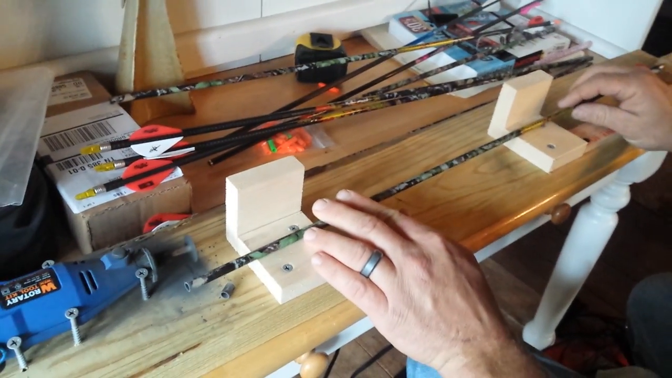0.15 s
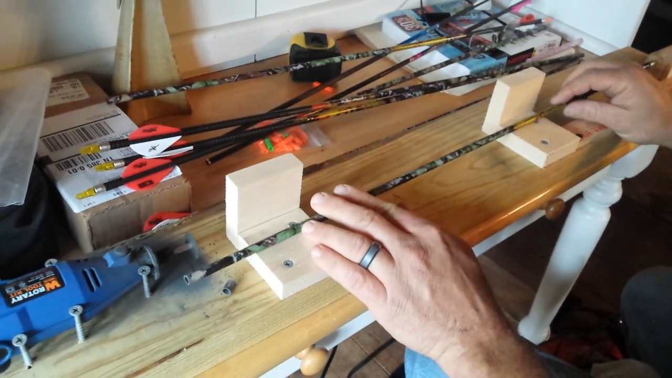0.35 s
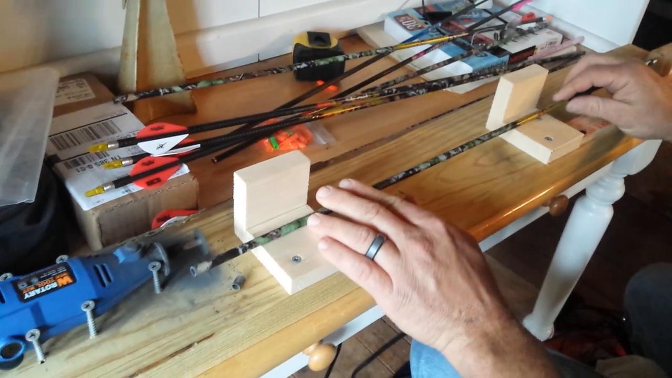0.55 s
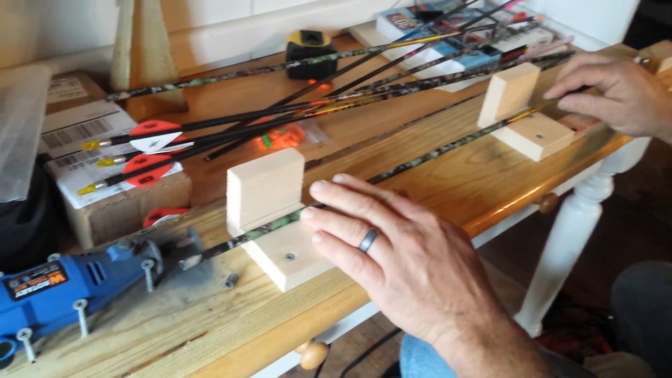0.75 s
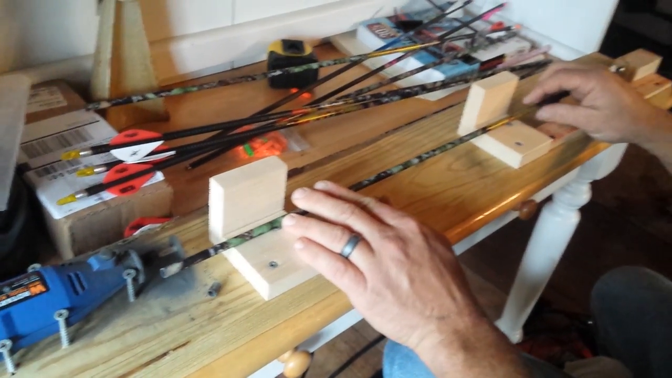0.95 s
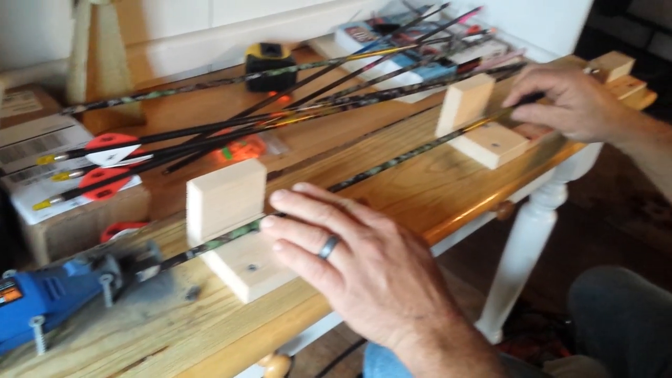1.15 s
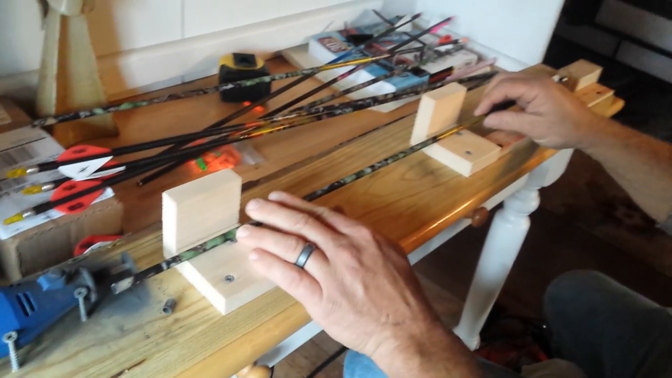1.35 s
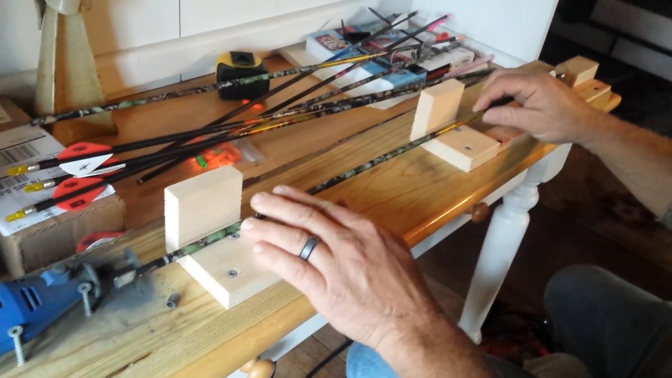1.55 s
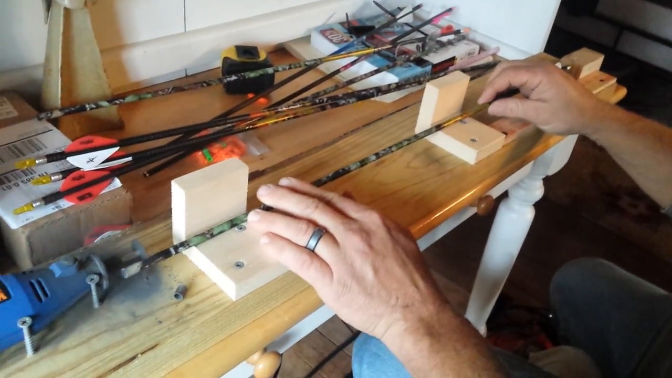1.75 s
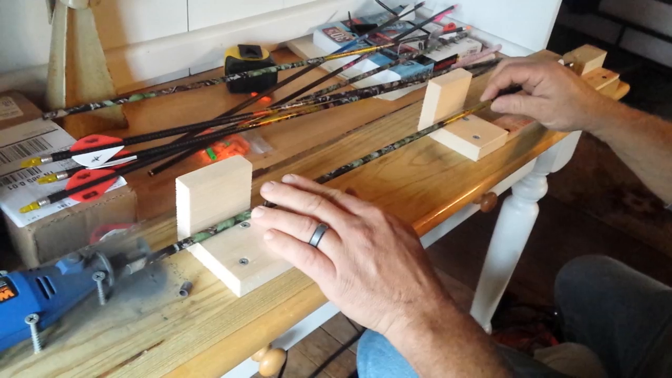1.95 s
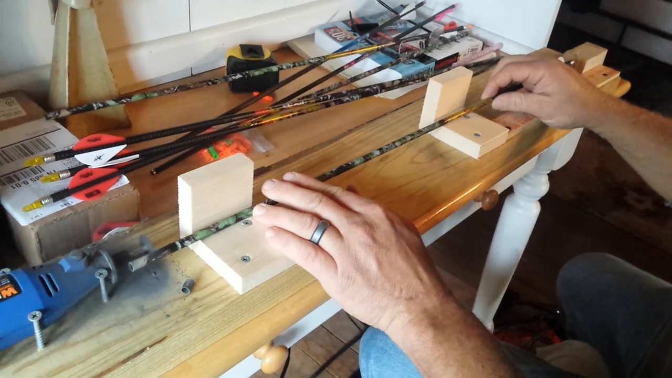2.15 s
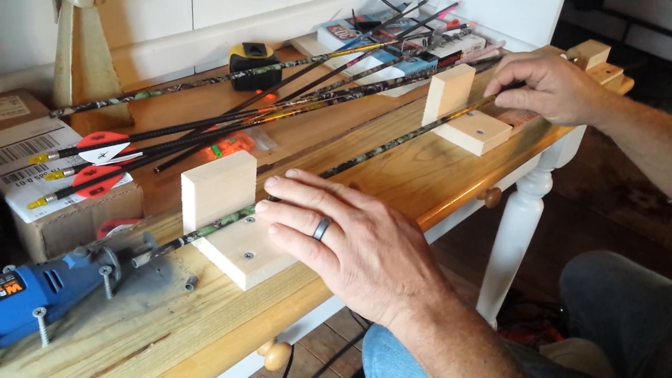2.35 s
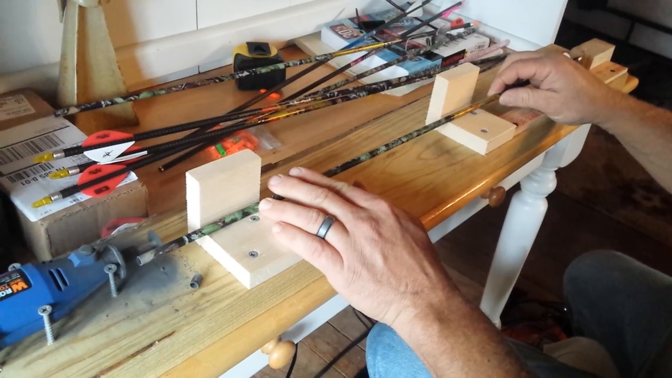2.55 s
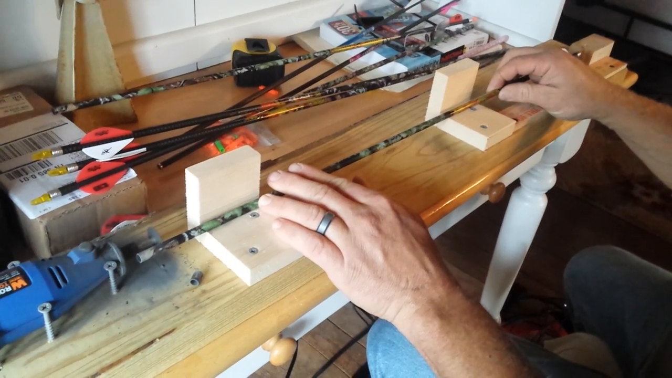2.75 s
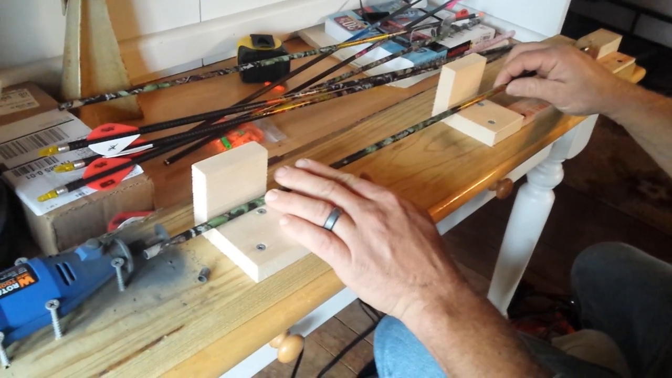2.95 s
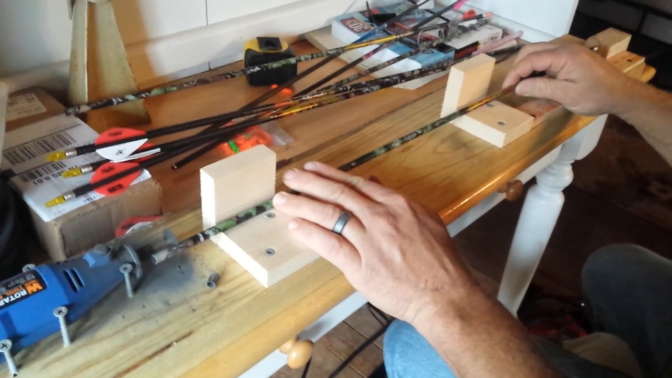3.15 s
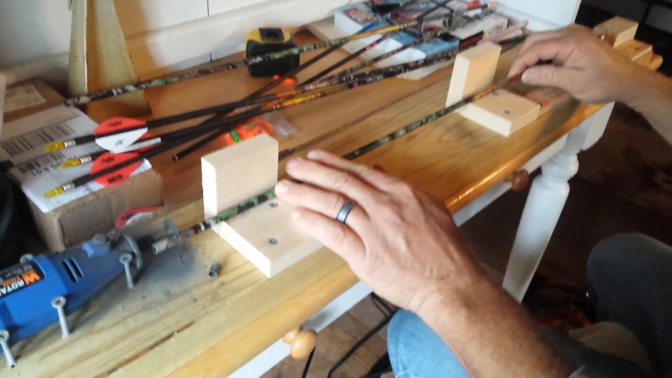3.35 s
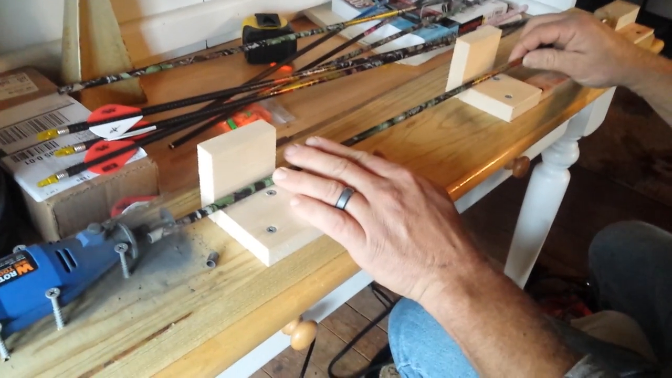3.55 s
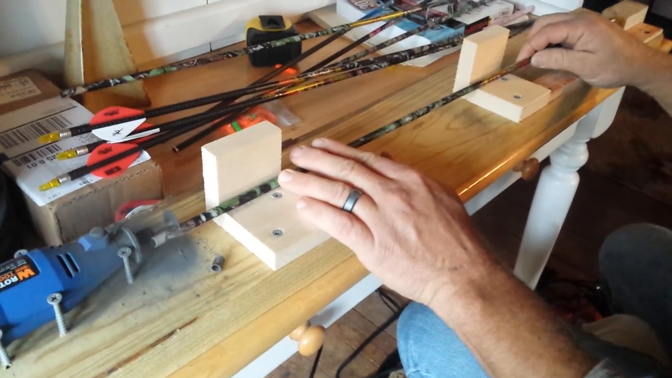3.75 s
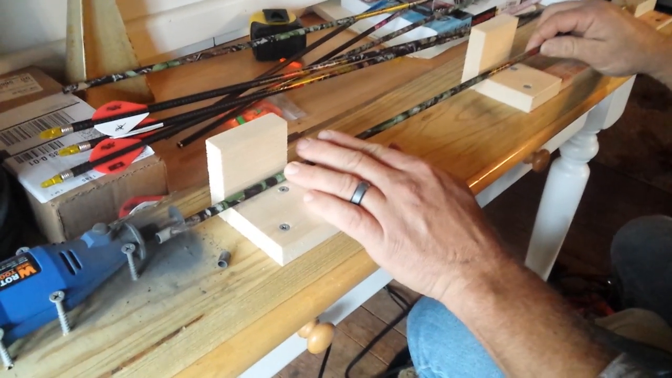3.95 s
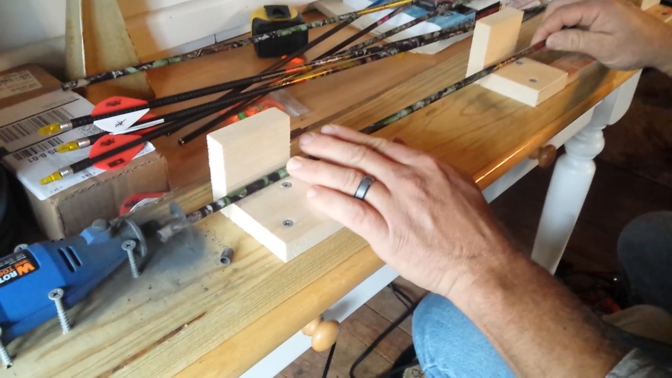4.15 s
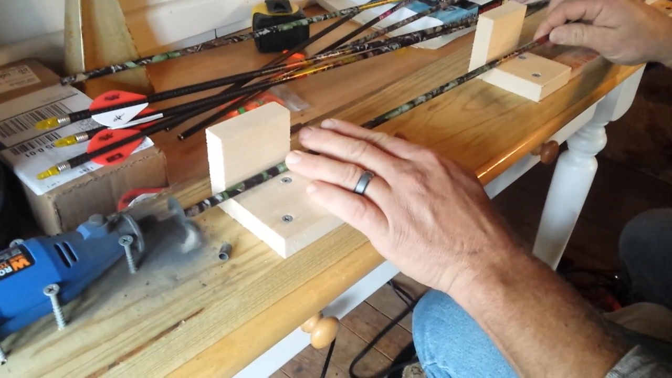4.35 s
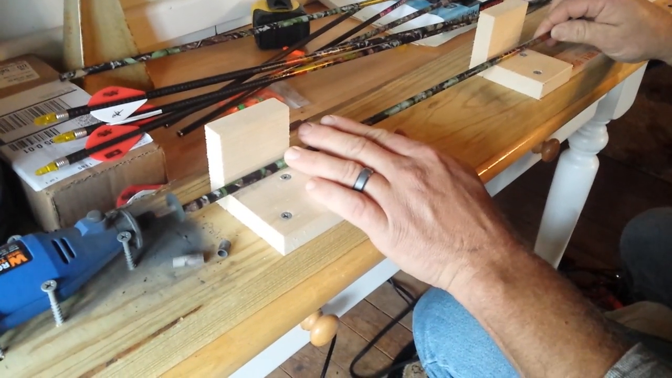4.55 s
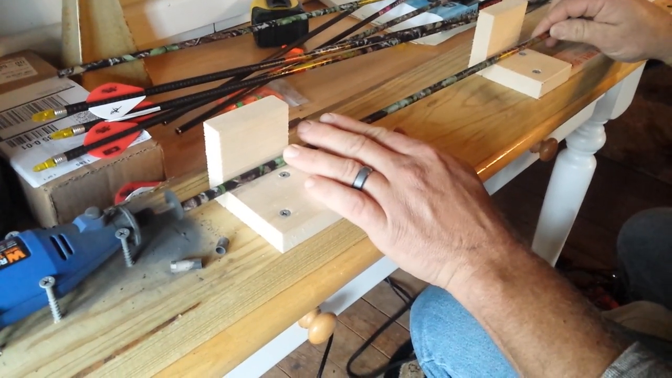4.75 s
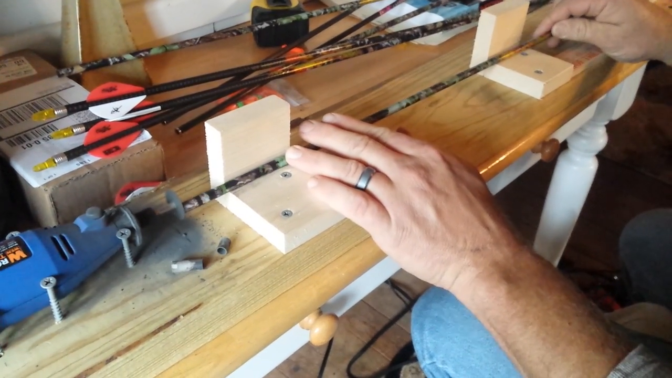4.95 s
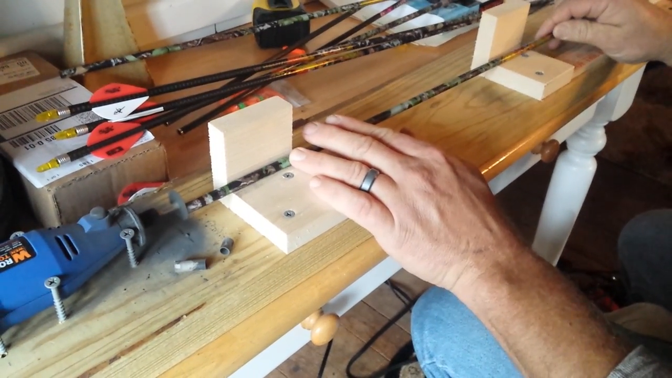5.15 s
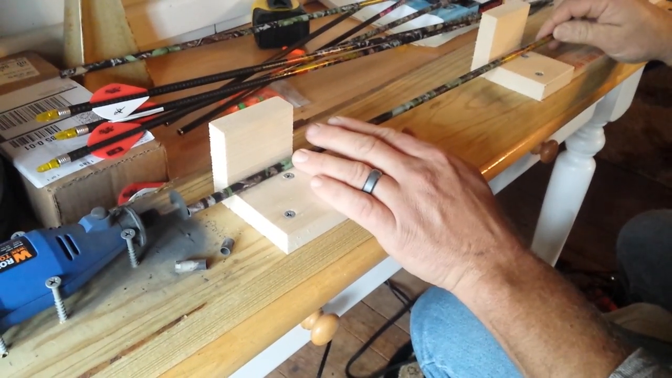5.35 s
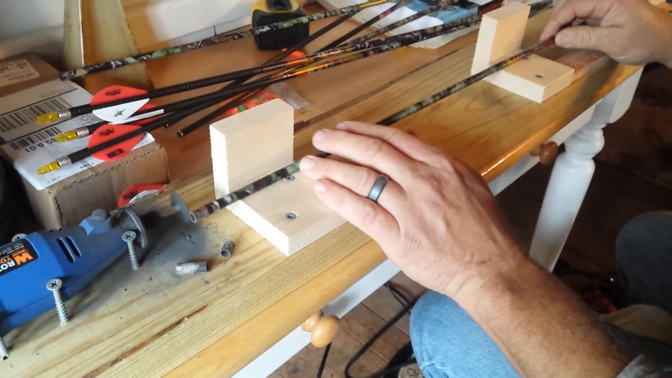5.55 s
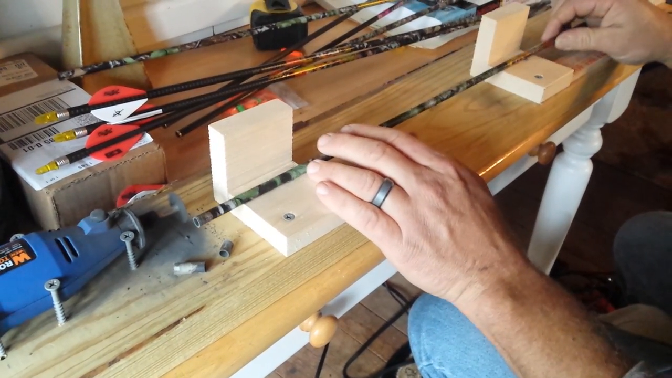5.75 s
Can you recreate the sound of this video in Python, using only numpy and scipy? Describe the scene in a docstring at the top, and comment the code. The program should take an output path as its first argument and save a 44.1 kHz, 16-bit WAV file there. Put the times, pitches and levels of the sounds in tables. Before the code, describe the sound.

A small high-speed rotary tool whines steadily, then grinds shrilly through a thin shaft, sagging in pitch, squeals, and runs free again.

```python
"""A wooden bench: a small rotary tool clamped to it spins a cut-off wheel at about 555 turns a second.
Its rotor hums as harmonics of the turn, its fan whines and blows pulsing air, its bearings add tones.
An arrow shaft is pushed against the wheel, which slows, knocks on it once a turn and grinds through it
in bursts of noise. The wheel squeals on the cut end, then runs free again."""
import sys
import numpy as np
from scipy import signal
from scipy.fft import rfft, irfft, next_fast_len
from scipy.io import wavfile
from scipy.ndimage import uniform_filter1d, minimum_filter1d

SR = 44100
rng = np.random.default_rng(int(sys.argv[2]) if len(sys.argv) > 2 else 0)


def output_pcm(signal):
    """Save a mono or channel-first signal as 16-bit PCM at the path in sys.argv[1].

    Samples are clipped to [-1, 1] before scaling.
    """
    pcm = np.clip(np.atleast_2d(signal).T, -1, 1) * 32767
    wavfile.write(sys.argv[1], SR, np.round(pcm).astype(np.int16))


N = 255339
T = np.arange(N) / SR

# overall level shared by second order, whine, tones, air and rocking: loud, then lower from
# the first bite on: time_s, level_db
SHARED_LEVEL = [(0, -19.5), (1.49, -17), (1.56, -25), (1.7, -28.5), (4.5, -26), (4.7, -31.5), (5.05, -32.5),
                (5.15, -29.5), (5.79, -28.5)]
# stereo balance over frequency: freq_hz, left_minus_right_db
BALANCE = [(200, 0), (2000, -0.5), (4500, 0), (7000, 2.5), (7700, -2.5), (8500, -14), (10500, -8.5),
           (11800, -16), (13300, -17.5), (14200, 5.5), (15200, -10)]

FREE_HZ, FULL_LOAD_SAG_HZ = 555.1, 41.5  # turn rate unloaded; its drop at full load
BLADES = 18  # whine cycles per turn
ROCK_ORDER = .345  # rocking cycles per turn


def undb(db):
    """Decibels to amplitude gain."""
    return np.exp(np.asarray(db) * (np.log(10) / 20))


def curve(rows):
    """Second column of a table, linear in time."""
    rows = np.array(rows)
    return np.interp(T, rows[:, 0], rows[:, 1])


def db_at(points, hz):
    """Spectrum in dB, read on a log-frequency axis."""
    points = np.array(points)
    return np.interp(np.log(hz + 1), np.log(points[:, 0]), points[:, 1])


def unit(x):
    """Scale to rms one."""
    return x / np.sqrt(np.mean(x ** 2))


def pan(left_minus_right_db):
    """Left and right gains of constant power."""
    gains = undb(np.array([[1], [-1]]) * left_minus_right_db / 2)
    return gains / np.sqrt(np.mean(gains ** 2, axis=0))


def wander(rate_hz, times_s=T):
    """Random knots at a given rate, joined by lines; spread near one."""
    knots = rng.standard_normal(N // 24)
    return 1.2 * np.interp(times_s * rate_hz, np.arange(len(knots)), knots)


def hiss(colour, gate, shared):
    """Gated, coloured stereo noise of rms one; the two microphones share part of its power."""
    noise = rng.standard_normal((3, N))
    common, separate = noise[2], noise[:2]
    gated = (np.sqrt(shared) * common + np.sqrt(1 - shared) * separate) * gate
    size = next_fast_len(N)
    hz = np.arange(size // 2 + 1) * SR / size
    # the left port is a little further away: 4 samples
    lag = np.exp(-2j * np.pi * hz * np.array([[4], [0]]) / SR)
    spectrum = rfft(gated, size) * lag * undb(db_at(colour, hz)) * pan(db_at(BALANCE, hz))
    return unit(irfft(spectrum, size)[:, :N])


def tone(angle, pan_db, lead=1.0):
    """Stereo sine of rms one; the left side leads by an angle in radians."""
    return np.sqrt(2) * pan(pan_db) * np.array([np.sin(angle + lead), np.sin(angle)])


def rotor(angle, sag_hz):
    """Unbalance shakes the housing at the lowest orders; the fourth and fifth rise with the third."""
    # first order, before a 1.5 dB lift: time_s, level_db
    first_level = [(0.05, -35), (1.48, -30), (1.73, -55), (1.81, -44), (3.4, -46), (4.13, -58), (4.8, -39),
                   (4.91, -44), (5.27, -35), (5.75, -34)]
    # third order, all but gone in the cut: time_s, level_db
    third_level = [(0, -32.5), (1, -28), (1.5, -28.5), (1.6, -49), (1.72, -47), (2.55, -51.5), (2.75, -53),
                   (4.2, -57), (4.4, -41), (4.95, -43.5), (5.79, -28.5)]
    second_db, fade_db_per_hz, max_fade_db, second_lag_s = -1.83, 0.6, 32, .04
    waver_db, waver_rate_hz = 1.14, 11

    first = undb(curve(first_level) + 1.5) * tone(angle, -6.5, lead=-0.55)

    # the second order fades with the sag, a little late
    fade_db = np.minimum(fade_db_per_hz * sag_hz, max_fade_db)
    prompt_db = curve(SHARED_LEVEL) + second_db - fade_db
    late_db = np.interp(T - second_lag_s, T, prompt_db)
    second = undb(late_db) * tone(2 * angle, 3.5, lead=-1.13)

    upper = tone(3 * angle, 3.8, lead=-1.6)
    upper = upper + undb(-17.5) * tone(4 * angle, -2.7) + undb(-21.0) * tone(5 * angle, 0)
    sway = undb(.35 * wander(40) + waver_db * wander(waver_rate_hz))
    return (first + second + undb(curve(third_level)) * upper) * sway


def motor(angle, hz, cutting_whine, ringing):
    """Fan whine joined by the wheel's in the cut, bearing tones, and cooling air pulsing with the rotor."""
    # brief dips of the free whine: centre_s, width_s, depth_db
    whine_dips = [(0.56, .11, 6), (5.17, .2, 3.5)]
    # bearing and commutator tones: cycles_per_turn, level_re_shared_db
    motor_tones = [(6, -28), (7, -24), (8, -17), (9, -25.5), (12, -18), (14, -13.5), (15, -10), (16, -7.5),
                   (17, -18), (19, -69), (20, -12.5), (21, -17.5), (22, -17), (25, -25)]
    # ball-race tones between the orders: cycles_per_turn, level_re_shared_db
    race_tones = [(.345, -48), (.655, -42), (.784, -43), (1.344, -36.5), (2.656, -37), (3.216, -31)]
    # cooling air: freq_hz, relative_density_db
    air_colour = [(30, -27), (200, -23), (850, -18), (1120, -8), (1350, -15), (1750, -10), (2450, -7.5),
                  (3000, -17), (4000, -13), (4450, -3), (5000, -3), (7400, 0.5), (8500, 6.5), (9800, 1.5),
                  (11700, 3.5), (13300, -2), (15300, -13.5)]
    whine_db, whine_fade_db_per_hz = 0.5, 0.2  # re shared level; fade with sag
    tones_load_db = -8  # load takes up the play of the bearings
    hiss_under_ring_db = 6  # most the hiss is turned down under ringing contacts

    dip_db = sum(db * np.exp(-((T - time) / width) ** 2) for time, width, db in whine_dips)
    sag_hz = np.maximum(FREE_HZ - hz, 0)
    free_whine = undb(curve(SHARED_LEVEL) + whine_db - dip_db - whine_fade_db_per_hz * sag_hz)
    # in the cut the whine flutters as the contact shifts
    cutting_whine = cutting_whine * undb(2.2 * wander(70) + 1.6 * wander(11) - 1)
    whine = np.hypot(free_whine, cutting_whine)
    blades = whine * undb(1.0 * wander(45)) * tone(BLADES * angle, -11.0, lead=1.99)

    tones = 0
    whole_orders = [(round(order), db) for order, db in motor_tones]
    for order, db in whole_orders + race_tones:
        flicker_db = 1.5 * wander(60)
        balance_db = db_at(BALANCE, order * hz.mean())
        tones = tones + undb(db + flicker_db) * tone(order * angle, balance_db, lead=1.84)

    pulsing = 1 + .16 * np.cos(2 * angle) + .08 * np.cos(angle)
    air = hiss(air_colour, pulsing, shared=0.11) * undb(-hiss_under_ring_db * ringing)
    load = np.clip((FREE_HZ - hz) / FULL_LOAD_SAG_HZ, 0, 1)
    return blades + undb(curve(SHARED_LEVEL)) * (undb(tones_load_db * load) * tones + air)


def bench(angle, sag_hz):
    """The tool rocks the bench at about a third of its speed, more under load, over a faint mains hum."""
    rock_db, rock_load_db = -50.5, 22.5  # re shared level; rise at full load
    rock = ROCK_ORDER * angle + .5 * wander(22)
    load = np.minimum(sag_hz / FULL_LOAD_SAG_HZ, 1)
    # under heavy load the rocking beats with the turn: side tone above the hum
    rocking = tone(rock, 0, lead=0.057) + undb(-23) * load ** 3 * tone(angle + rock, 1)
    rocking_db = curve(SHARED_LEVEL) + rock_db + rock_load_db * load + 1.2 * wander(11)

    mains = 2 * np.pi * 60 * T + .3 * wander(8)
    mains_hum = undb(-76.5) * tone(mains, 0) + undb(-77.5) * tone(2 * mains, 0, lead=0.29)
    return undb(rocking_db) * rocking + mains_hum


def contact(kind):
    """Pushes of one kind, each attack, hold and release: knock, grit and whine gains, lower ring, slip."""
    # pushes on the wheel (silent if start is far past end): kind, start_s, end_s, knock_db,
    # swell_over_push_db, lower_ring_db, grit_db, whine_db
    pushes = [("bite", 1.51, 1.522, -24, 0, 2.5, -23, -42), ("bite", 1.557, 1.563, -17.5, 0, 0, -22, -31),
              ("bite", 1.57, 1.634, -17.8, 1, 5, -26.5, -29),
              ("bite", 1.638, 1.68, -17.8, -1.5, 3.5, -27.5, -28),
              ("bite", 1.686, 1.724, -17.5, -1.5, 0, -22, -28),
              ("bite", 1.74, 1.746, -16.5, 0, -1, -20, -29),
              ("bite", 1.755, 1.82, -19.3, -2.2, 3.5, -28.5, -31),
              ("bite", 1.832, 1.945, -19.5, 3.2, -4.5, -27, -23),
              ("bite", 1.958, 2.035, -18.5, 1, -1, -25, -24),
              ("bite", 2.045, 2.207, -25.5, -5, -3, -28.5, -27),
              ("bite", 2.21, 2.242, -24, 2, -3.5, -27, -34), ("bite", 2.6, 2.285, -29, -5, 1, -29, -28),
              ("cut", 2.297, 2.7, -24.5, 8, 1.6, -43, -38), ("cut", 2.4, 2.495, -25, 3.5, 1.2, -34, -37),
              ("cut", 2.496, 2.503, -20, 0, 1, -22, -40), ("cut", 2.535, 2.58, -24, 0, 1.7, -27, -40),
              ("cut", 2.588, 2.615, -27, 0, 1.4, -29, -34), ("cut", 2.625, 2.72, -26, 0.87, 0, -32, -26),
              ("cut", 2.72, 2.86, -23.5, 1, 1, -31, -20.5), ("cut", 2.87, 3.09, -21.5, 1, 1.7, -30, -26),
              ("cut", 3.1, 3.44, -21.5, 0.93, 0, -27.5, -23.5),
              ("cut", 3.45, 3.505, -20.5, 1, 2.1, -24, -27), ("cut", 3.51, 3.585, -19, -2.2, 1.6, -21, -22),
              ("cut", 3.592, 3.622, -16, 0, 2.8, -16, -18), ("cut", 3.65, 4.15, -25, 0, 4.3, -19, -25.5),
              ("cut", 4.152, 4.168, -20, 0, 4.1, -18.5, -25),
              ("cut", 4.185, 4.245, -24.5, -1.96, 1.4, -21.5, -25),
              ("cut", 4.27, 4.412, -25, -6, -1, -41, -24), ("cut", 4.425, 4.505, -22, 0, -5, -39, -24),
              ("squeal", 4.54, 4.76, -17, -0.5, -2, -26.5, -29),
              ("squeal", 4.76, 4.91, -15, -0.5, 0, -23.5, -22.5),
              ("squeal", 4.91, 4.965, -12.5, 0, 1.6, -23, -23),
              ("squeal", 4.968, 5.062, -15, 1.72, 1.6, -27, -35),
              ("squeal", 5.062, 5.078, -29, -13, -7, -15, -37)]
    # how each kind takes hold and lets go: attack_s, release_s
    grip_times = {"bite": (.003, .024), "cut": (.016, .034), "squeal": (.014, .018)}
    attack_s, release_s = grip_times[kind]
    judder_db, judder_rate_hz = {"bite": .6, "cut": .5, "squeal": .1}, 110  # shaft in the hand
    # scatter of the knock when grit equals knock, in radians of a turn
    slip_rad, slip_power = {"bite": .036, "cut": .03, "squeal": .018}, .7
    # skids on the smooth shaft until a groove is worn
    skid_rad, groove_s, groove_fade_s = .02, 1.85, .1

    judder = undb(judder_db[kind] * wander(judder_rate_hz))
    power, ring_sum, weight = np.full((3, N), 1e-18), np.zeros(N), np.full(N, 1e-12)
    for name, start, end, knock_db, swell_db, ring_db, grit_db, whine_db in pushes:
        if name != kind:
            continue
        near = (T > start) & (T < end + 10 * release_s)
        t = T[near]
        attack = np.minimum((t - start) / attack_s, 1)
        release = np.exp(-np.maximum(t - end, 0) / release_s)
        swell = undb(swell_db * (np.clip((t - start) / (end - start), 0, 1) - .5))
        pressure = (attack * release * swell * judder[near]) ** 2
        power[:, near] += np.outer(undb([knock_db, grit_db, whine_db]) ** 2, pressure)
        ring_sum[near] += ring_db * pressure
        weight[near] += pressure

    knock, grit, whine = np.sqrt(power)
    # the more grit for its knock, the more the wheel slips
    slip = slip_rad[kind] * (grit / knock) ** slip_power
    skid = skid_rad * np.clip((groove_s - T) / groove_fade_s, 0, 1)
    return knock, grit, whine, ring_sum / weight, slip + skid


def ring_phases(turns, size=64):
    """Order phases of a knock ringing briefly in the shaft; the microphones differ more in the treble."""
    decay = np.exp(-np.arange(size) / size / turns)
    phases = np.angle(rfft(rng.standard_normal(size) * decay))
    apart = np.minimum(np.arange(len(phases)) / 4, 1) * (.78 + .2 * rng.standard_normal(len(phases)))
    return phases + np.array([apart, -apart])


def chatter(angle, hz, touch, colour, ring_turns, flutter_db, ripple_db, patchy_db, even_db, rock_db):
    """One knock a turn, scattered by slip; a second touch half a turn on (even_db) lifts the even orders."""
    knock, _, _, ring_db, slip = touch
    on = knock > undb(-60)
    # the motor's torque ripples at twice the mains frequency
    ripple = np.sin(2 * np.pi * 120 * T)
    # a slipping wheel strikes unevenly, both in time and in strength
    turn = angle + slip * (wander(350) + .6 * wander(70)) + .024 * ripple
    bounce_db = 14 * slip * wander(130)
    # rocking makes knocks strong and weak by turns: side tones between the orders
    rock = np.cos(ROCK_ORDER * angle + wander(40))
    size = knock * undb(bounce_db + flutter_db * wander(450) + ripple_db * ripple + rock_db * rock)

    phases = ring_phases(ring_turns)
    t, low_db = T[on], ring_db[on]
    knocks, power = 0, 0
    for order in range(2, 30):
        if order == BLADES:  # this order is the whine
            continue
        f = order * hz[on]
        low_share = np.clip((8200 - f) / 1200, 0, 1)
        # a skidding contact moves along the shaft: each partial swells and wavers alone
        swell_db = (1.2 + 35 * slip[on]) * wander(45, t) + patchy_db * wander(9, t)
        phase = order * (turn[on] + .6 * slip[on] * wander(250, t))
        gain = undb(db_at(colour, f) + low_share * low_db + even_db * (-1) ** order)
        partial = np.cos(phase + phases[:, order, None])
        knocks = knocks + gain * undb(swell_db) * pan(db_at(BALANCE, f)) * partial
        power = power + gain ** 2 / 2
    out = np.zeros((2, N))
    out[:, on] = size[on] * knocks / np.sqrt(power)
    return out


def grinding(angle, grit, colour, burst):
    """Uneven grains scrape the shaft, in a burst as the wheel's high side comes round."""
    grains = np.exp(burst * np.cos(angle - 1)) * undb(1.4 * wander(1500) + .6 * wander(90))
    return grit * hiss(colour, grains, shared=0.45)


def scene():
    """Everything follows the angle of the spindle and the pushes of the shaft."""
    # spindle: time_s, turn_rate_hz
    speed = [(0.1, 555.4), (0.4, 555.1), (1.47, 555.1), (1.54, 554.1), (1.58, 549.6), (1.67, 537.0),
             (1.76, 520.8), (1.82, 516.6), (1.95, 512.2), (2.03, 508.8), (2.12, 514.1), (2.22, 522.6),
             (2.41, 530.1), (2.57, 528.3), (2.75, 534.8), (2.95, 538.5), (3.24, 535.8), (3.54, 536.4),
             (3.67, 530.7), (3.8, 531.8), (3.95, 534.1), (4.17, 534.9), (4.27, 533.6), (4.45, 537.7),
             (4.65, 544.1), (4.9, 549.3), (4.99, 547.6), (5.25, 552.8), (5.45, 554.7), (5.7, 556.1)]
    # contact spectra: freq_hz, relative_level_db
    bite_colour = [(1000, -14), (1550, -14.5), (2100, -7), (2700, -17), (3200, -19), (3650, -16),
                   (4200, -6.5), (4750, -10), (5400, 1), (5900, 3), (6250, -6), (7200, -5.5), (8200, 7.5),
                   (8800, -0.5), (9800, -2.5), (10800, 8.5), (11500, 3.5), (12500, -5), (15300, -8)]
    cut_colour = [(1000, -17.5), (1600, -22), (2100, -12), (2700, -14.5), (3200, -14), (3750, -11),
                  (4300, -10), (4800, -4.5), (5800, 2.5), (6400, -3.5), (7500, 2.5), (8500, 13),
                  (9100, 2.5), (10500, 14), (12200, 8), (13300, -2), (15000, -3.5)]
    squeal_colour = [(1000, -25), (2200, -17.5), (3200, -19.5), (3850, -13), (4400, -8.5), (4950, -15),
                     (5500, -4), (6030, -1), (6570, 5.5), (7100, 3.5), (7700, -3), (8250, 8), (8800, 5),
                     (9800, -3), (10400, 6), (10950, 11.5), (11500, 5.5), (12050, 3), (13000, -5),
                     (15200, -16)]
    # noise of the cut, and thinner rasp of bite and squeal: freq_hz, relative_density_db
    grit_colour = [(100, -23), (900, -28.5), (1500, -25), (2300, -18), (3300, -24), (3900, -17),
                   (5000, -3.5), (7000, 8), (8500, 7), (11500, 4), (13000, -10), (15300, -8)]
    rasp_colour = [(100, -27.5), (900, -25.5), (2100, -23), (3300, -36), (4800, -33), (6200, -3),
                   (7500, 1.5), (8500, 1), (11500, 2), (13000, -5), (15300, -25)]
    # decay of one knock's ring, by kind: decay_turns
    ring_turns = {"bite": .27, "cut": .8, "squeal": .28}
    ring_scale_db = -15  # knock level at which the ringing saturates

    hz = curve(speed) + .08 * wander(12)
    angle = 2 * np.pi * np.cumsum(hz) / SR
    sag_hz = np.maximum(FREE_HZ - hz, 0)
    biting, cutting, squealing = contact("bite"), contact("cut"), contact("squeal")
    rasp, grit = np.hypot(biting[1], squealing[1]), cutting[1]
    whine = biting[2] + cutting[2] + squealing[2]
    ringing = np.tanh((biting[0] + squealing[0]) / undb(ring_scale_db))

    bite = chatter(angle, hz, biting, bite_colour, ring_turns["bite"],
                   flutter_db=1, ripple_db=-0.4, patchy_db=2, even_db=0, rock_db=.6)
    cut = chatter(angle, hz, cutting, cut_colour, ring_turns["cut"],
                  flutter_db=.9, ripple_db=.3, patchy_db=3, even_db=0.5, rock_db=2.2)
    squeal = chatter(angle, hz, squealing, squeal_colour, ring_turns["squeal"],
                     flutter_db=0.4, ripple_db=0.7, patchy_db=1.1, even_db=0, rock_db=.5)
    scrape = grinding(angle, grit, grit_colour, burst=.25) + grinding(angle, rasp, rasp_colour, burst=.7)
    tool = rotor(angle, sag_hz) + motor(angle, hz, whine, ringing) + bench(angle, sag_hz)
    return tool + bite + cut + squeal + scrape


def record(dry):
    """A limiter catches the highest peaks, then a steep low-pass cuts off the top of the treble."""
    ceiling, window, top_hz = .92, 240, 15450  # window in samples
    headroom = np.minimum(ceiling / (np.abs(dry).max(axis=0) + 1e-9), 1)
    gain = uniform_filter1d(minimum_filter1d(headroom, size=window), size=window)
    low_pass = signal.ellip(10, .2, 80, top_hz, fs=SR, output="sos")
    return signal.sosfilt(low_pass, dry * gain)


dry = scene()
out = record(dry)
output_pcm(out)
```